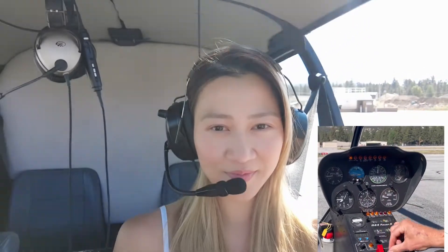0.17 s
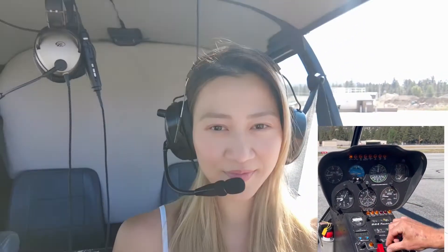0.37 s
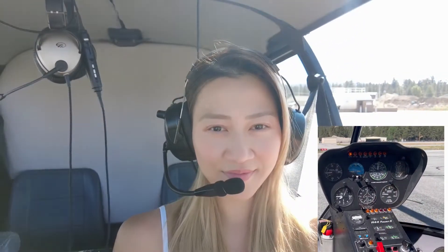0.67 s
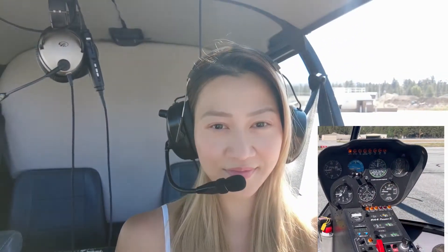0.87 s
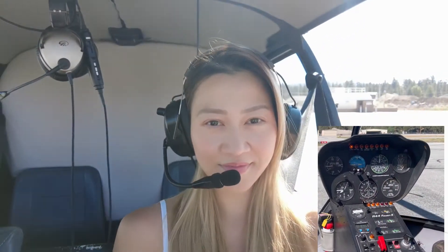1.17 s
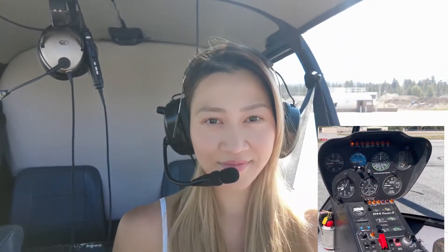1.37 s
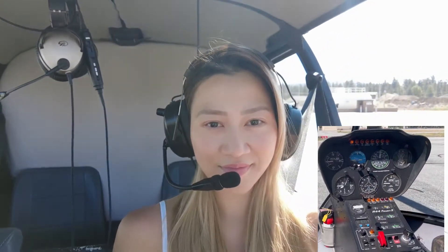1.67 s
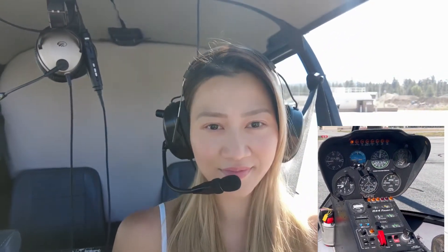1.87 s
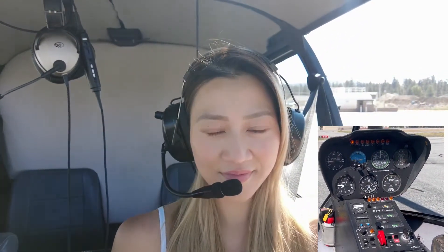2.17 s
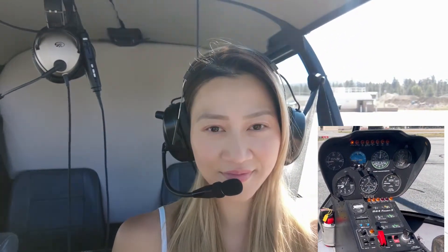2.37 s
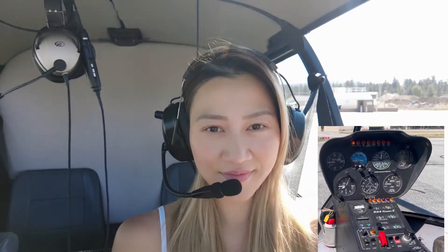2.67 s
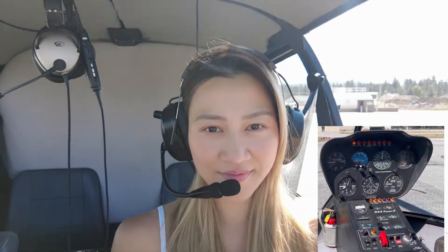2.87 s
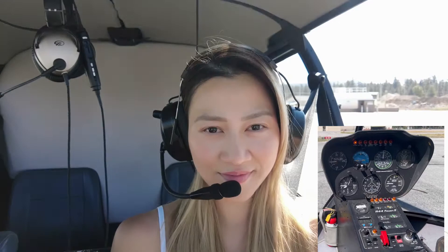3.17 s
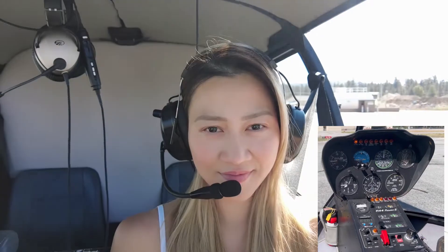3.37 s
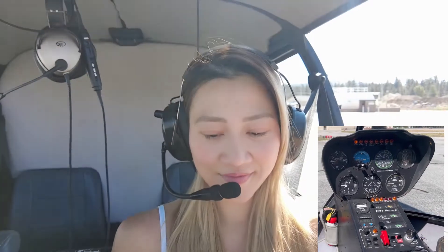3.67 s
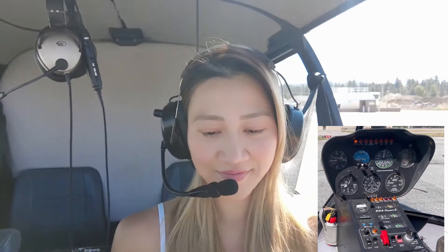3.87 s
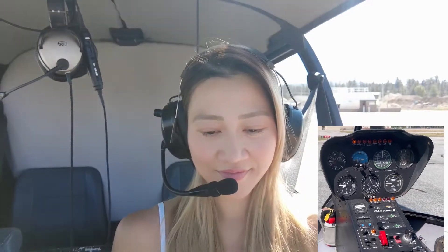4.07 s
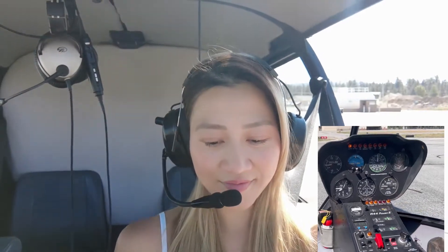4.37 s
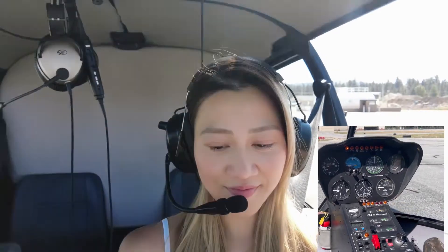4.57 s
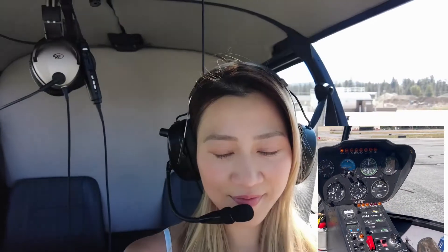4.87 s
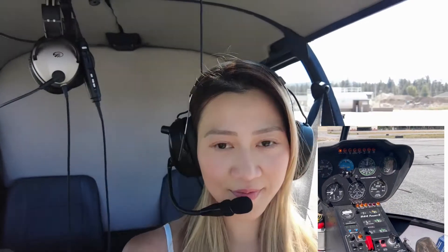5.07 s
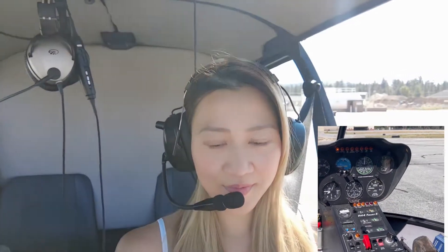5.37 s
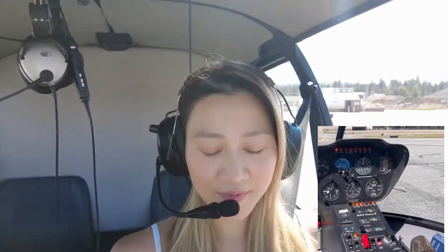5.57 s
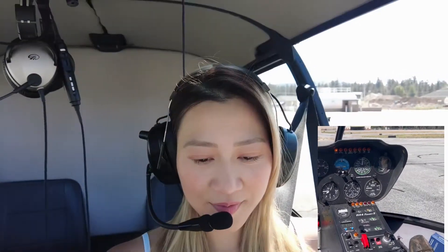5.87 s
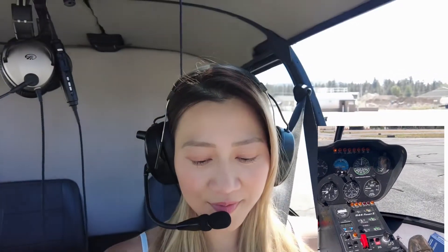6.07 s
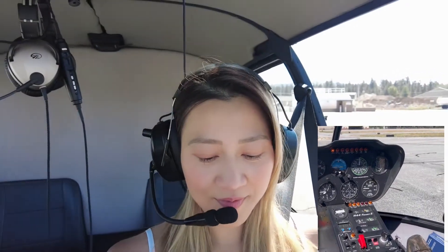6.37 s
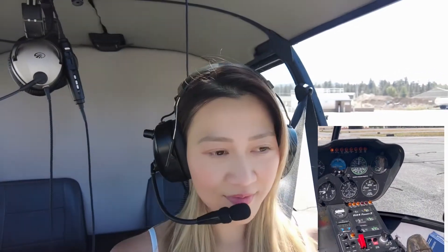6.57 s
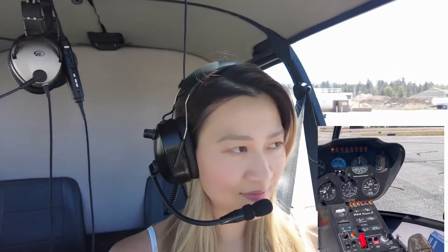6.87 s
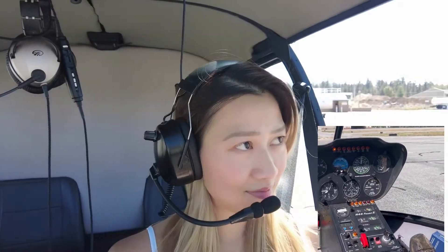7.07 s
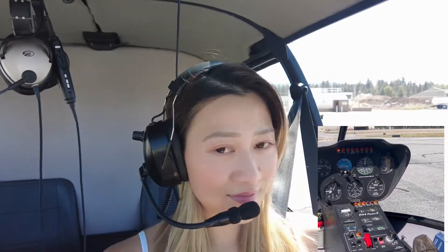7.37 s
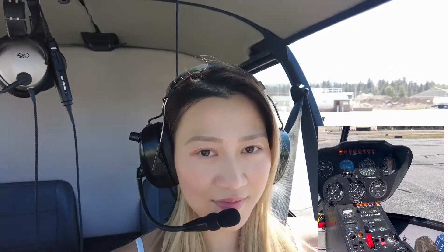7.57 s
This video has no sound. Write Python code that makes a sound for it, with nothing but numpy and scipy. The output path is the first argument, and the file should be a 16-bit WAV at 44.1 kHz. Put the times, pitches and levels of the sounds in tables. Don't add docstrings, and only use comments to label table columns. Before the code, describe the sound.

Inside a small helicopter cabin, a piston engine drones low and steady near idle, wavering in speed, with airy roar, clatter and occasional soft thumps.

```python
import sys
import numpy as np
from scipy import signal
from scipy.fft import rfft, irfft
from scipy.io import wavfile
from scipy.ndimage import uniform_filter1d

SR = 44100
rng = np.random.default_rng(int(sys.argv[2]) if len(sys.argv) > 2 else 0)


def output_pcm(signal):
    pcm = np.clip(np.atleast_2d(signal).T, -1, 1) * 32767
    wavfile.write(sys.argv[1], SR, np.round(pcm).astype(np.int16))


def ratio(d):
    e = np.asarray(d, float) / 20
    return 10 ** e


N = 340011
CYLINDERS = 6


def walk(rate_hz, size=N, sr=SR):
    hold = int(sr / rate_hz)
    held = np.repeat(rng.standard_normal(size // hold + 1), hold)
    slewed = uniform_filter1d(uniform_filter1d(held, hold), hold)
    return 1.3 * slewed[:size]


def boost(hz, modes):
    return sum(boost_db / (1 + (2 * (hz - centre_hz) / width_hz) ** 2)
               for centre_hz, width_hz, boost_db in modes)


def drone(cycle, firing_hz, firing_db, octave_db, panel_db):
    # multiple, level_db
    engine_orders = [(2, -43), (3, -31), (4, -27), (5, -30), (6, -13), (7, -33.5), (8, -34), (9, -33.5),
                     (10, -34), (11, -41), (12, -26), (13, -34.5), (14, -32.5), (15, -37), (16, -35.5),
                     (17, -54), (18, -32), (19, -36.5), (20, -41.5), (21, -33.5), (22, -29), (23, -34.5),
                     (24, -38),
                     (25, -45.5), (26, -42.5), (27, -49.5), (28, -41), (29, -47), (30, -41.5), (31, -47),
                    (32, -45), (33, -55), (34, -32.5), (35, -48), (36, -40.5), (37, -40.5), (38, -35),
                    (39, -42), (40, -48.5), (41, -33.5), (42, -42.5), (43, -25), (44, -57), (45, -56),
                    (46, -43), (47, -42.5), (48, -35)]
    arrival = [(3, 0), (5, -.33), (6, -.23), (8, -.45), (9, -.7), (10, -1.04), (11, -.38), (12, -.75),
               (13, -.42), (14, -.18), (16, -.04), (18, -.23), (20, -.24), (21, 0), (22, 0), (23, -.42),
               (24, .07), (26, -.23), (29, .1), (34, -.15), (39, -.3), (48, -.2)]
    # multiple, left_minus_right_db, left_leads_rad
    ports = [(2, 0, 0), (5, 0, 0), (6, -2, 0), (8, -1, -0.2), (9, -4, -0.2), (10, 2, 2.6), (11, 8, 0.3),
             (12, 0, 0.6), (13, -1, 0.7), (14, -10, 0.4), (15, -6, -2.7), (16, 9, -0.4), (17, 4, 2.6),
             (18, 8, 1.5), (19, 10, 1.5), (21, 0, 1.0), (22, -5, 0.7), (24, -7, 0.4), (25, 1, 1.3),
             (30, -4, -0.3), (33, -7, 1.2), (34, -1, 2.5), (35, 3, 2.3), (38, 6, 2.0), (42, -1, 2.2),
             (48, 4, 3.6)]
    # centre_hz, width_hz, boost_db
    canopy = [(102.6, 8.5, -22), (125, 8.7, -9), (217.8, 3.8, 8), (247.84, 7.1, 9), (252.5, 6.7, -2),
              (309, 12, 0.5), (403.4, 23, 13), (491, 21, -19), (516, 27, 15), (536.6, 21.5, 22.5),
              (582.8, 45, 25.5), (669, 24, 22)]

    decimate = 10
    tone_sr = SR / decimate
    cycle, firing_hz = cycle[::decimate], firing_hz[::decimate]
    count = len(cycle)
    swells = [((6, 6), firing_db), ((12, 12), octave_db), ((21, 24), panel_db)]

    lag = 2 * np.pi * np.cumsum(np.interp(np.arange(-1, 60), *np.transpose(arrival)))
    lag = lag + (lag[12] - 2 * lag[6]) - .46
    multiples, pans_db, leads_rad = np.transpose(ports)

    tones = np.zeros((2, count))
    for k, level_db in engine_orders:
        pan_db = np.interp(k, multiples, pans_db)
        lead = np.interp(k, multiples, leads_rad)
        swell_db = 0
        for (lowest, highest), curve_db in swells:
            if lowest <= k <= highest:
                swell_db = swell_db + (curve_db - np.median(curve_db))[::decimate]
        ring = ratio(boost(k * firing_hz / CYLINDERS, canopy))
        ring = ring / np.sqrt(np.mean(ring ** 2))
        scatter = .3 if k in (6, 12) else 1
        waver_db = scatter * 0.74 * walk(6., count, tone_sr)
        strength = np.sqrt(2) * ratio(level_db + swell_db + waver_db) * ring
        angle = 2 * np.pi * k * cycle - lag[k] + scatter * .2 * walk(5., count, tone_sr)
        tones[0] += strength * ratio(pan_db / 2) * np.cos(angle + lead / 2)
        tones[1] += strength * ratio(-pan_db / 2) * np.cos(angle - lead / 2)
    return signal.resample_poly(tones, decimate, 1, axis=1, padtype="line")[:, :N]


def band(x, lo_hz, hi_hz):
    corners_hz = [lo_hz, min(hi_hz, .45 * SR)]
    return signal.sosfilt(signal.butter(2, corners_hz, "bandpass", fs=SR, output="sos"), x)


def through_cabin(shared, own):
    # band_hz, left_db_per_hz, right_db_per_hz,
    # likeness_0_to_1
    cabin_noise = [(21, -63, -63, 1), (34, -55, -55, 1), (48, -39, -39, 1), (62, -39, -39, 1), (89, -46, -45, 1),
                   (140, -59, -61, .6), (199, -59, -53, .85), (253, -53, -58, .75), (322, -58, -52, .9),
                   (377, -61, -61, .6), (445, -63, -58, .65), (486, -60, -62, .85), (569, -52, -53, .85),
                   (623, -53, -56, .85),
                   (715, -54, -60, 0.26), (751, -54.5, -53.5, 0.56), (876, -55, -56.5, 0.097),
                (1070, -56, -56.5, 0.31), (1500, -58.5, -62.5, 0.28), (1830, -61.5, -62, 0.52),
                (2170, -65.5, -67.5, 0.21), (2500, -62, -64.5, 0.19), (3070, -64.5, -67, 0.35),
                (3490, -64, -73, 0.27), (3910, -69, -65.5, 0.18), (4240, -68.5, -79, 0.18),
                (4670, -67, -76.5, 0.21), (5280, -65, -73, 0.35),
                   (5450, -80, -71, 0.13), (5640, -81.5, -98.5, 0.08), (5890, -69.5, -77.5, 0.11),
            (6980, -75.5, -86, 0.069), (7070, -79, -78, 0.12), (7670, -90, -94, 0.27),
            (7990, -77.5, -85, 0.2), (9600, -92, -91, 0.51), (10200, -90, -92, 0.39),
            (11200, -91, -89, 0.28), (12500, -93, -97, 1), (14000, -91, -88, 0.64), (14500, -92, -91, 0.99),
            (15500, -112, -112, 0.92)]
    # band_hz, lead_rad
    port_lead = [(0, 0), (120, 0), (5200, 13.3), (5900, 15.7), (11000, 15.4), (12200, 12.57),
                 (22050, 12.57)]
    # centre_hz, width_hz, boost_db
    cabin = [(703, 12, 0), (751, 4.5, 13), (784, 11, 6.5), (868, 12, 5), (968.4, 20.4, 7), (1001, 11, 6.5),
             (1202, 16, 4), (1230, 72, 4), (1467, 9.4, 11), (1840, 53, -1.5), (2132, 22, 10), (2220, 14, 3),
             (2610, 26, 5.5), (2960, 40, -0.5), (3107, 27, 9), (3300, 36, -1.5), (3530, 59, 3),
             (4060, 58, -4), (4156, 46, 9), (5200, 140, -1)]

    freqs = np.fft.rfftfreq(N, 1 / SR)
    band_hz, left_db, right_db, likeness = np.transpose(cabin_noise)

    def across(column):
        return np.interp(np.log(freqs + 1), np.log(band_hz), column)

    like = np.clip(across(likeness), 0, 1) ** .7
    late = np.exp(-1j * np.interp(freqs, *np.transpose(port_lead)))
    common = np.sqrt(like) * rfft(shared) * np.array([np.ones_like(late), late])
    separate = np.sqrt(1 - like) * rfft(own)
    colour_db = np.array([across(left_db), across(right_db)]) + boost(freqs, cabin) + 0.09
    gain = ratio(colour_db) * np.sqrt(SR / 2)
    gain[:, freqs > 14750] = 0
    return irfft(gain * (common + separate), N)


def roar(cycle, load_db):
    throb_db = 1.06 * np.cos(2 * np.pi * cycle + 2.24) + 0.58 * np.cos(6 * np.pi * cycle)
    air = rng.standard_normal((3, N)) * ratio(throb_db)
    points = 3200
    pattern = rng.standard_normal((3, points + 1))
    place = cycle % 1 * points
    valves = np.array([np.interp(place, np.arange(points + 1), row) for row in pattern])
    share = .5
    loaded = ratio(load_db) * (np.sqrt(1 - share) * air + np.sqrt(share) * valves)
    air = air + band(loaded - air, 373.0, 5660.0)
    return through_cabin(air[0], air[1:])


def stumbles():
    # time_s, thump_db, thump_hz
    misfires = [
        (0.03, -27, 53.7),
        (0.501, -11, 56),
        (1.443, -21, 55),
        (2.662, -32, 60.1),
        (3.0, -30, 45),
        (4.85, -23, 56.5),
        (5.701, -11, 60.4),
        (6.527, -10, 55.17),
    ]
    thumps = np.zeros(N)
    t = np.arange(int(.12 * SR)) / SR
    swell_s = 0.019
    envelope = 3.3 * (t / swell_s) * np.exp(-t / swell_s)
    for time_s, thump_db, thump_hz in misfires:
        i = max(int((time_s - .03) * SR), 0)
        thumps[i:i + len(t)] += ratio(thump_db) * envelope * np.sin(2 * np.pi * thump_hz * t)
    return thumps


def ticks():
    # start_s, peak_db, centre_hz, t60_s
    buckle = [
        (0.264, -25.5, 14700, 0.048),
        (1.4956, -36, 12500, 0.051),
        (3.5169, -43, 12500, 0.071),
        (3.5837, -30, 14000, 0.045),
        (3.6325, -34, 13700, 0.059),
        (3.7067, -26, 14000, 0.049),
    ]
    ring_db, snap_s, pan_db = -14, .0035, 3.5
    metal = np.zeros((2, N))
    t = np.arange(int(.1 * SR)) / SR
    noise = rng.standard_normal((len(buckle), len(t)))
    onset = 1 - np.exp(-t / .0002)
    for (start_s, peak_db, centre_hz, t60_s), row in zip(buckle, noise):
        decay = np.exp(-np.log(1000) * t / t60_s)
        ring = ratio(ring_db) * decay * band(row, .8 * centre_hz, 1.15 * centre_hz)
        crack = band(row, .68 * centre_hz, 1.14 * centre_hz) + 0.3 * band(row, 5500.0, 11100.0)
        snap = np.exp(-t / snap_s) * crack
        i = int(start_s * SR)
        metal[:, i:i + len(t)] += ratio(peak_db + 8) * onset * (ring + snap)
    return metal * ratio(np.array([[pan_db], [-pan_db]]) / 2)


def scene():
    # time_s, firing_rate_hz
    speed = [(0.0, 83.23), (0.23, 87.62), (0.55, 88.3), (0.92, 83.9), (1.2, 83.9), (1.56, 78.6),
             (2.05, 82.78), (2.4, 83.1), (2.76, 81.06), (3.25, 82.86), (4.25, 80.14), (5.25, 81.23),
             (5.6, 84.25), (6.1, 81.45), (6.36, 82.92), (6.72, 79.53), (7.2, 83.58), (7.71, 85.62)]
    # time_s, level_db
    effort = [(0.0, -16.5), (0.25, -9.5), (0.47, -12.5), (0.78, -10.5), (1.35, -17), (1.43, -12), (1.6, -9),
              (1.87, -11), (1.93, -15), (2.45, -15), (2.65, -20), (2.675, -12), (3.58, -15.5), (3.72, -11),
              (6.4, -12.5), (6.52, -17), (6.6, -11.5), (7.71, -10)]
    t = np.arange(N) / SR
    firing_hz = np.interp(t, *np.transpose(speed))
    firing_hz = uniform_filter1d(firing_hz, size=SR // 10, mode="nearest")
    faster_hz = firing_hz - 82
    firing_db = np.interp(t, *np.transpose(effort))
    cancel_db = boost(firing_hz, [(81.2, 2.4, -10)])
    octave_db = 0.53 * faster_hz + cancel_db + 1.3 * walk(5.)
    panel_db = boost(firing_hz, [(82.8, 7, 11)])
    load_db = -0.19 + 0.3 * faster_hz - 0.2333 * t + .7 * walk(4.)
    cycle = np.cumsum(firing_hz) / SR / CYLINDERS + .37
    engine = drone(cycle, firing_hz, firing_db, octave_db, panel_db) + roar(cycle, load_db)
    return engine + stumbles() + ticks()


def low_pass(x):
    return signal.sosfilt(signal.butter(12, 15750, fs=SR, output="sos"), x)


def record(dry):
    rounded = np.tanh(0.58 * dry) / 0.62
    return low_pass(rounded)


dry = scene()
out = record(dry)
output_pcm(out)
```